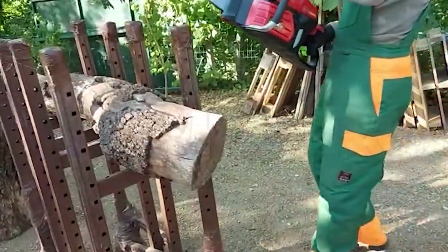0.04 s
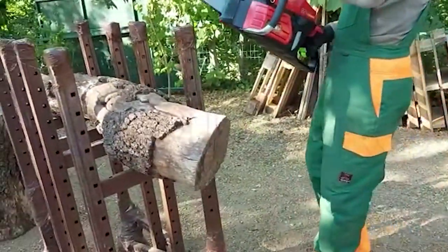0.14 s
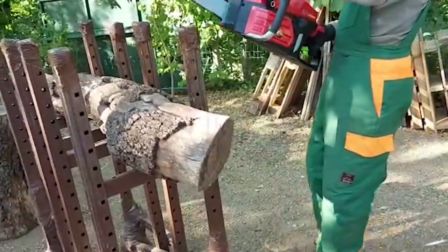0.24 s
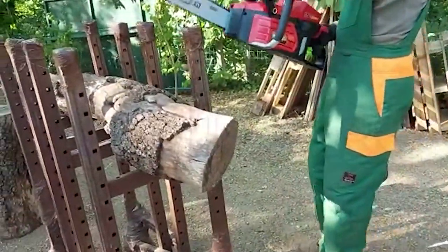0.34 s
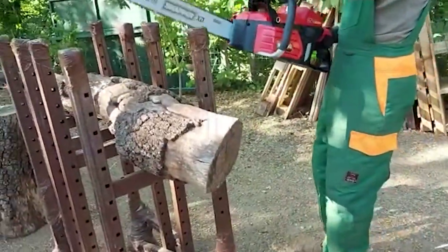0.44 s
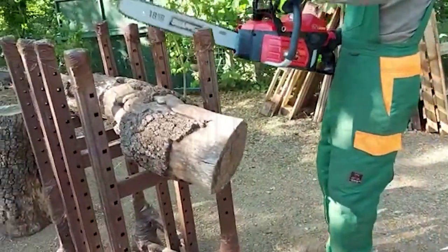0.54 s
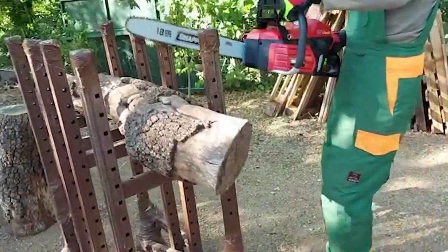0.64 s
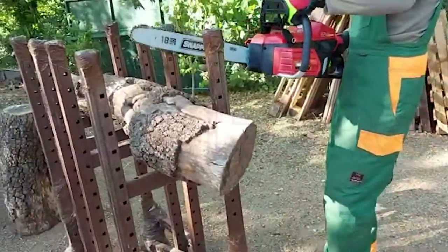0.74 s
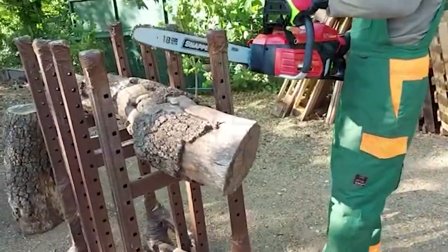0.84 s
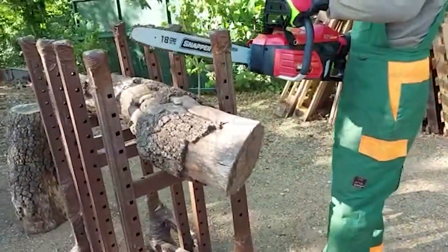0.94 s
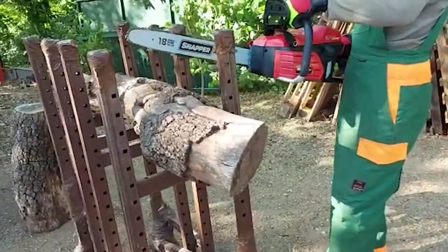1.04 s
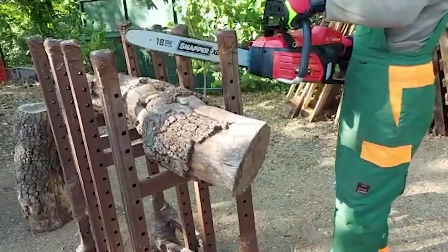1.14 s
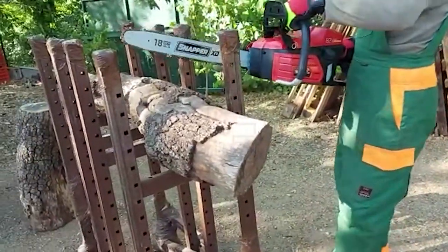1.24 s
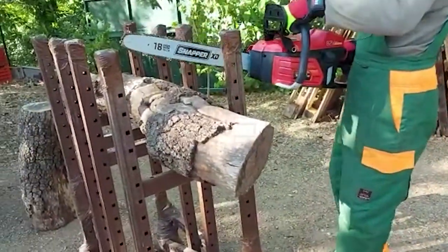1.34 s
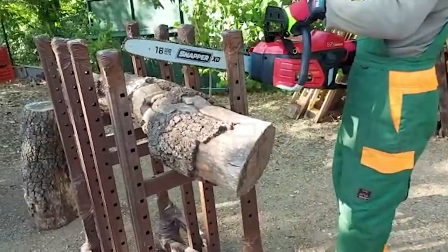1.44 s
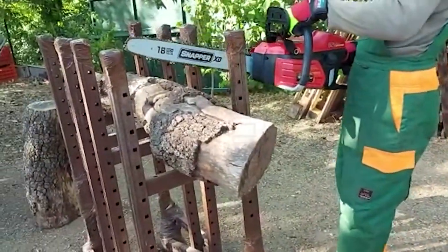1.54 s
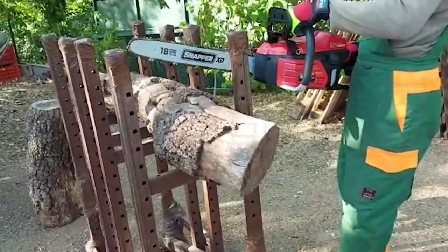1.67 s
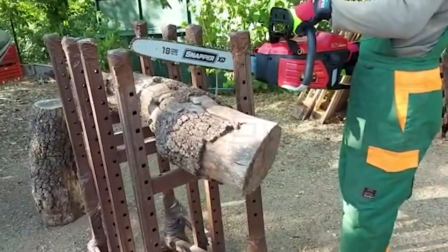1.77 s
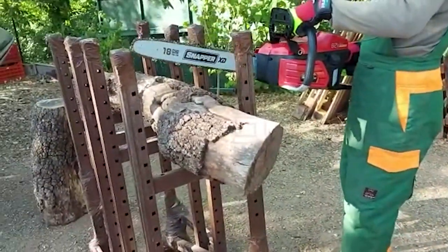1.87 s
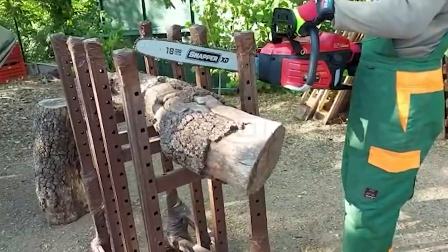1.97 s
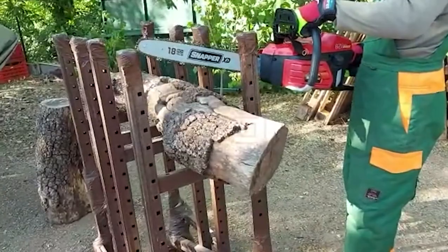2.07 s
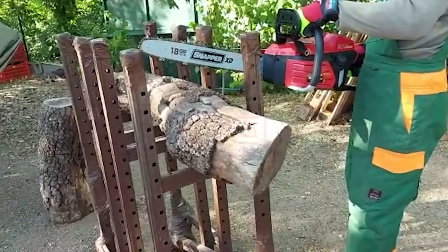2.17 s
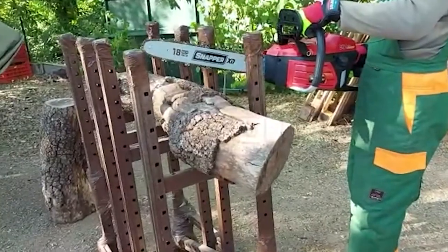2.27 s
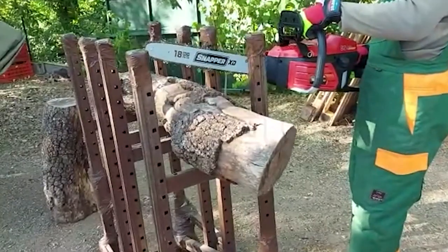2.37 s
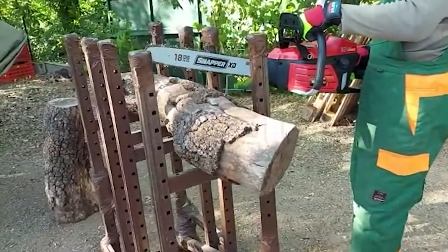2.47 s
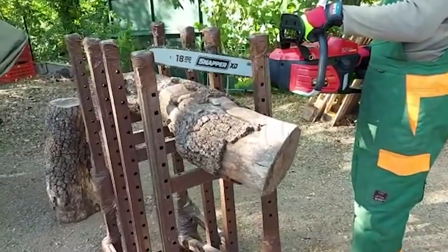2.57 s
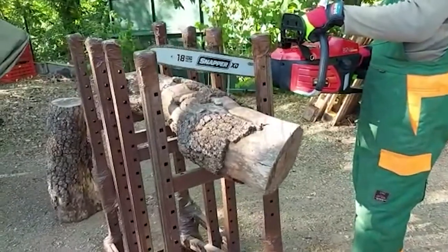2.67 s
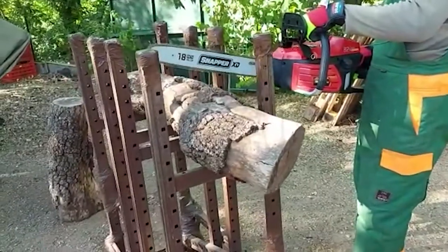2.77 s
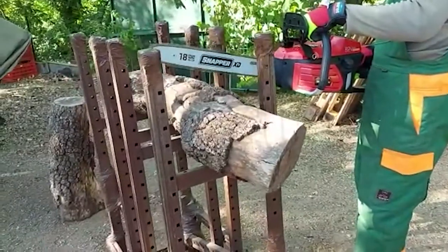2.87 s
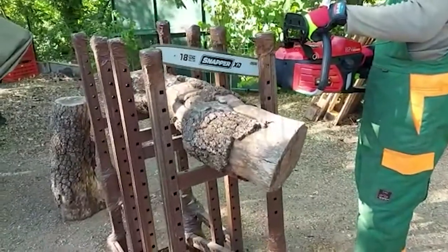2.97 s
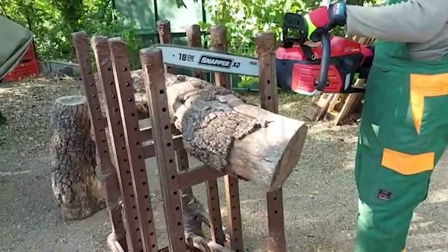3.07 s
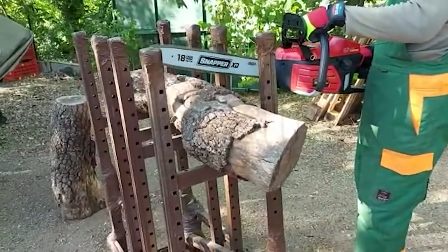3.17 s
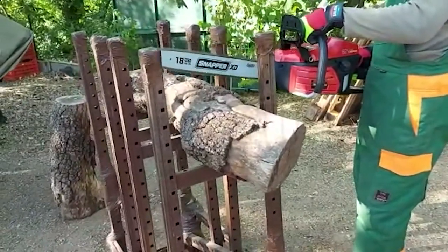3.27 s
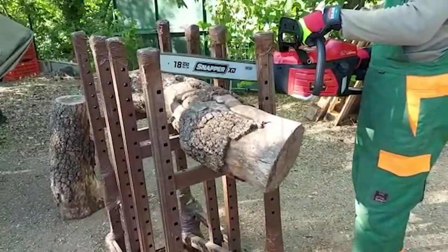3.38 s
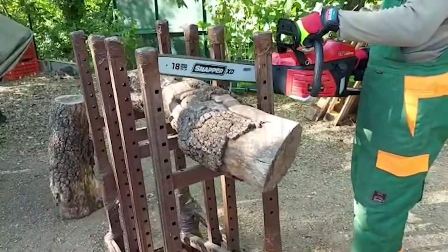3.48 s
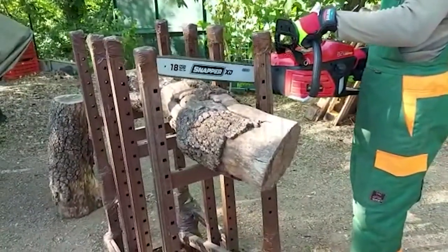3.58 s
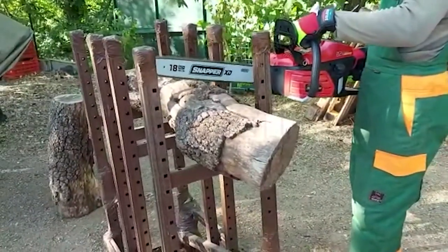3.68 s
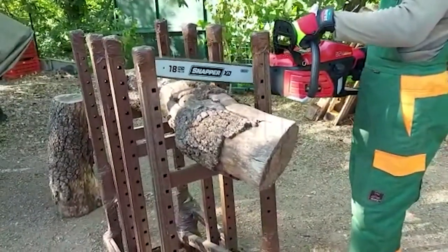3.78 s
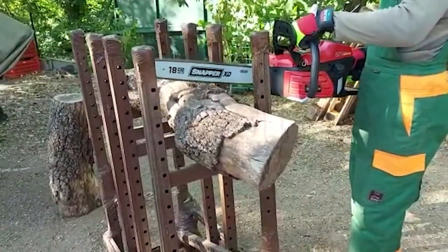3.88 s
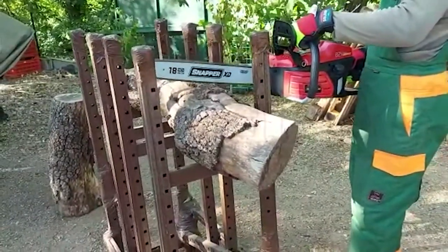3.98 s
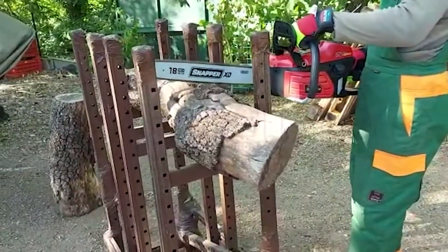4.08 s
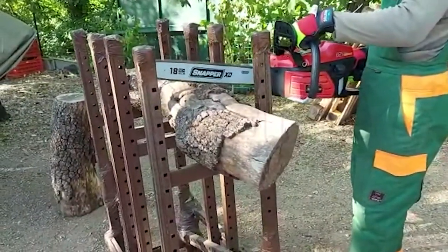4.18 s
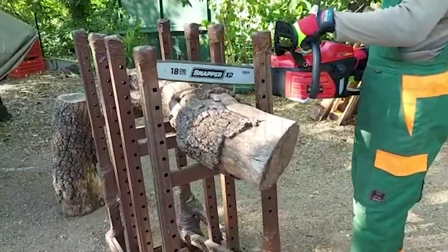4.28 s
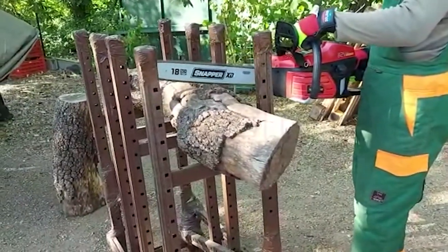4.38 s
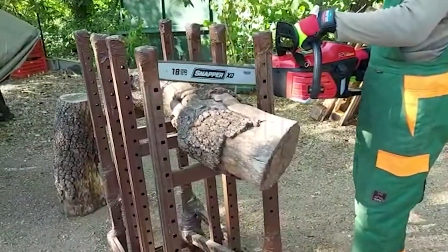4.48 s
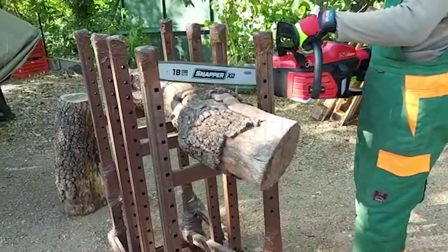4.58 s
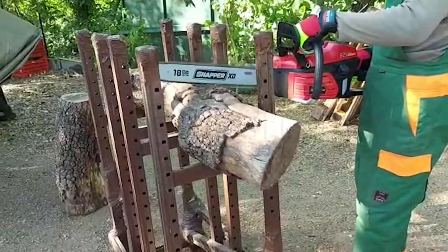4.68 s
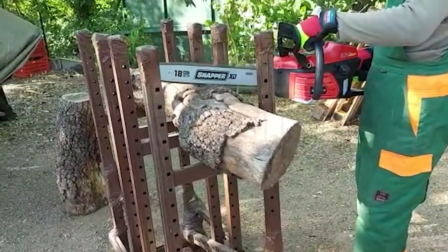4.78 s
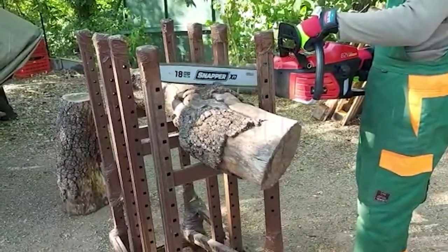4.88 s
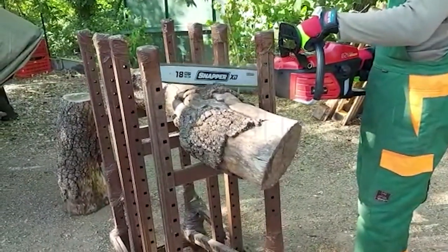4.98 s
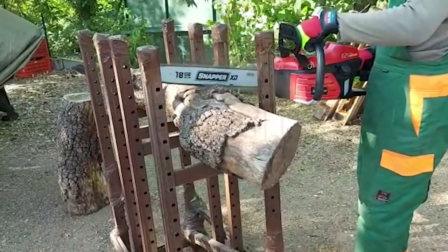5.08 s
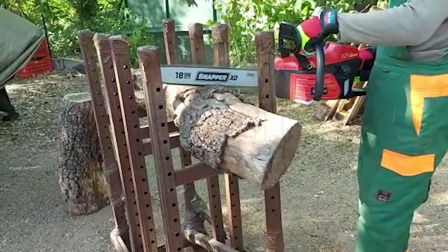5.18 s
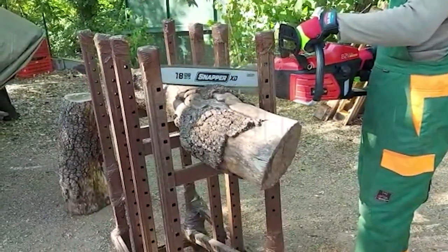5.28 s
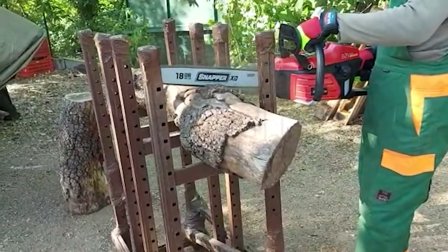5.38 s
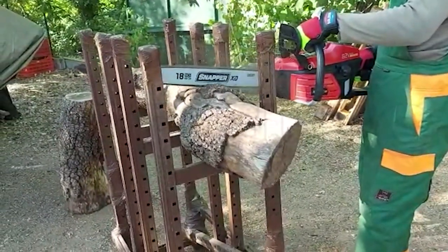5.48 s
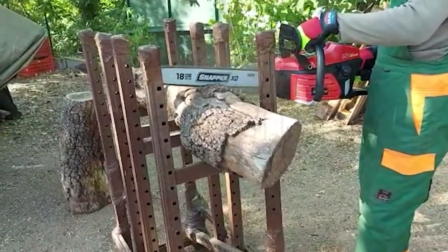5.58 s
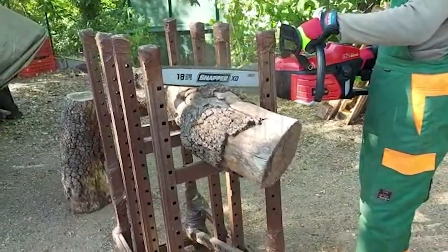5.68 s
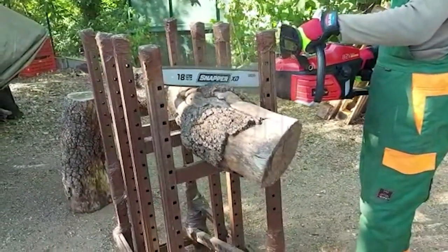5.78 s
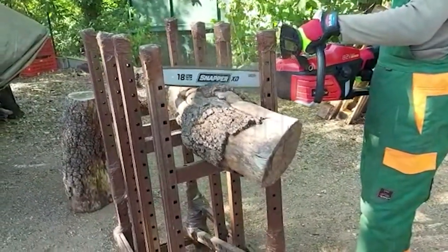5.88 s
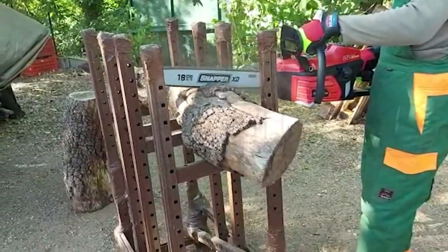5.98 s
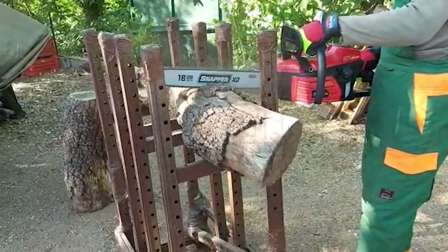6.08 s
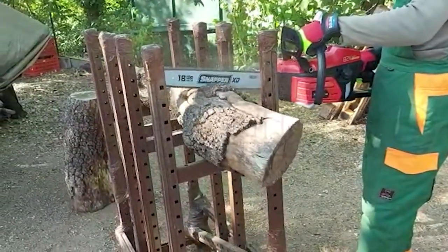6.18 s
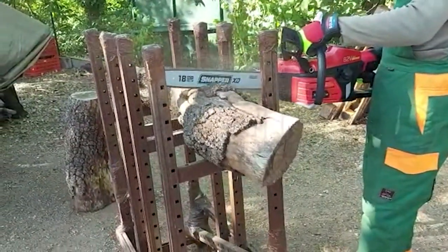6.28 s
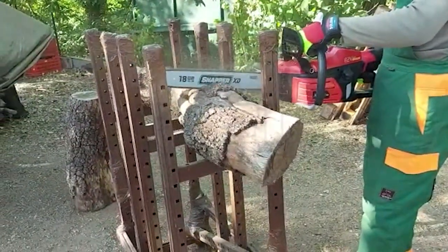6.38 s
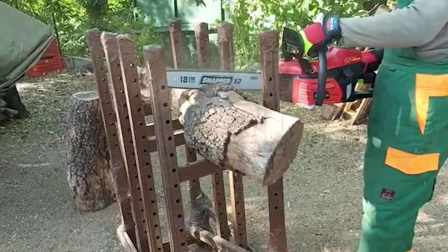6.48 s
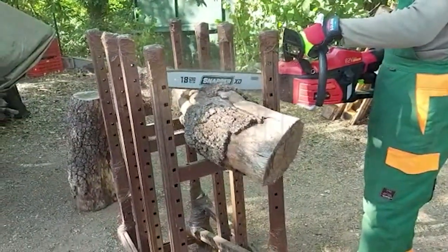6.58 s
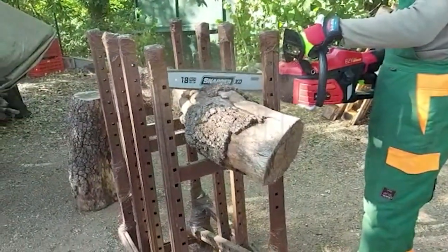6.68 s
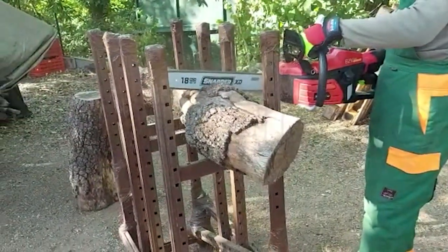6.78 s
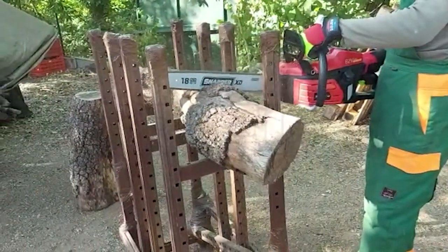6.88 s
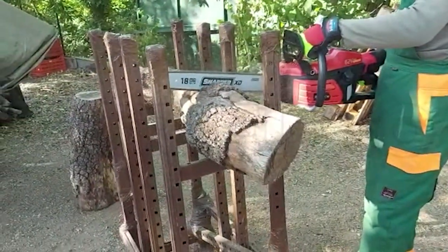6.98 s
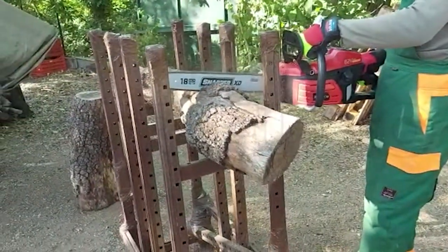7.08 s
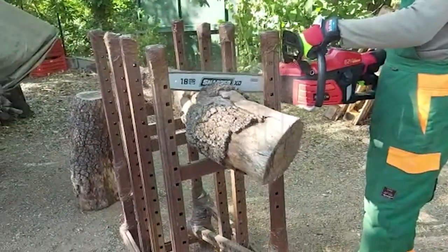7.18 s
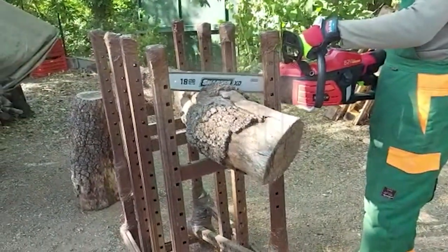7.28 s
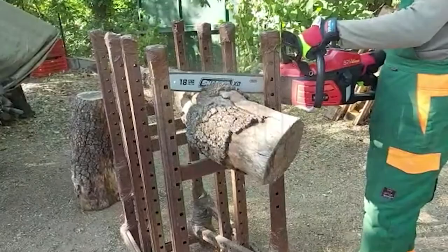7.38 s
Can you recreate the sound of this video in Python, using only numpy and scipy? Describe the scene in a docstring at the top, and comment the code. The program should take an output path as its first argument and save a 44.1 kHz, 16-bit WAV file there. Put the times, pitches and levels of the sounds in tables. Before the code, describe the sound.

Heard close in stereo, a slack chain's clatter fades at once, leaving a nearly silent yard with soft rustling and low handling thumps. After a trigger snap, an electric saw jerks into motion, its pitch rising fast and levelling into a buzzing whine with hissing, rattling chain and ringing guide bar. Lightly touching a log, it sags only slightly in pitch, while wind rumbles against the microphone.

```python
"""A battery chainsaw's chain coasts to rest close to two microphone ports in a yard: filtered noise that quickly fades.
The operator shuffles up to a log (noise strokes, decaying sines) and pulls the trigger (short noise clicks).
The motor spins up to a steady whine, sines locked to one shaft; the chain, noise jerked by that shaft, rattles
round its bar and runs lightly on the wood, while filtered noise makes the bar ring.
Faint outdoor air lies underneath, steady coloured noise; puffs of wind, slowly shaped noise, buffet the ports."""
import sys
import numpy as np
from scipy import signal
from scipy.fft import rfft, irfft
from scipy.io import wavfile

SR = 44100
rng = np.random.default_rng(int(sys.argv[2]) if len(sys.argv) > 2 else 0)


def unload_wav(signal):
    """Save mono or channel-first audio to the path in sys.argv[1] as 16-bit WAV at rate SR, clipped to [-1, 1]."""
    wavfile.write(
        sys.argv[1],
        SR,
        np.round(np.clip(np.atleast_2d(signal).T, -1, 1) * 32767).astype(np.int16),
    )


N = 327663
TIME, FREQ = np.arange(N) / SR, np.fft.rfftfreq(N, 1 / SR)  # s, Hz


def from_db(db):
    """Decibels to amplitude gain."""
    return 10 ** (np.asarray(db) / 20)


def unit(x):
    """Scales to rms 1, over both ports together."""
    return x / np.sqrt(np.mean(x ** 2) + 1e-20)


def curve(rows):
    """Reads a time table at every sample."""
    return np.interp(TIME, *np.transpose(rows))


def at_hz(points, hz=FREQ):
    """Reads a frequency table on a log-frequency axis."""
    f, value = np.transpose(points)
    return np.interp(np.log(hz + 1), np.log(f + 1), value)


def colour(x, db):
    """Filters x by a gain in dB at each frequency, then scales to rms 1."""
    return unit(irfft(rfft(x) * from_db(db), N))


def noise_pair():
    """White noise, unrelated at the two ports."""
    return rng.standard_normal((2, N))


def wander(rate_hz):
    """Smooth random drift of rms 1: noise that fades out above about the given rate."""
    drift = rfft(rng.standard_normal(N)) * np.exp(-(FREQ / rate_hz) ** 2)
    return unit(irfft(drift, N))


def burst(s, decay, rise):
    """Envelope of a blow: a quick rise and an exponential decay, peak 1."""
    age = np.maximum(TIME - s, 0)
    shape = (1 - np.exp(-age / rise)) ** 2 * np.exp(-age / decay)
    return shape / shape.max()


def ports(pair, likeness, balance_db, lead):
    """Turns two unrelated sounds into what the left and right ports hear, by likeness, level and phase."""
    a, b = rfft(pair)
    same = np.clip(likeness, -1, 1)
    right = (same * a + np.sqrt(1 - same ** 2) * b) * np.exp(-1j * lead)
    both = np.array([a * from_db(balance_db / 2), right * from_db(-balance_db / 2)])
    return unit(irfft(both, N))


# Still air of the yard. Each row: frequency in Hz, relative level in dB per Hz.
AIR_SPECTRUM = [(25, -34), (65, -16), (170, -12.5), (250, -2.5), (340, 0), (560, -16.5), (950, -15),
                (1400, -17), (1800, -17.5), (3200, -20), (4800, -15), (8000, -22), (12500, -22.5),
                (15700, -49)]
# The air's side-to-side level. Each row: frequency in Hz, left minus right in dB.
AIR_BALANCE_DB = [(300, 1), (1200, 11.5), (2200, 0), (5000, -8.5), (8000, -7), (11000, 3)]
# How alike the air is at the two ports. Each row: frequency in Hz, likeness from -1 to 1.
AIR_PORT_LIKENESS = [(60, .4), (300, 1), (700, 0.36), (1400, 0.15)]


def yard(air_db=-68):
    """Steady far hum and the hiss of leaves: coloured noise, partly alike at the two ports."""
    air = colour(noise_pair(), at_hz(AIR_SPECTRUM))
    return from_db(air_db) * ports(air, at_hz(AIR_PORT_LIKENESS), at_hz(AIR_BALANCE_DB), 0)


# Wind pressure on the ports. Each row: frequency in Hz, relative level in dB.
BUFFET_SPECTRUM = [(20, -23), (55, 2.5), (100, 1.5), (160, -7.5), (260, -20), (600, -35), (2000, -66)]
# The breeze freshens. Each row: time in seconds, level in dB before the puffs and each port's own gain.
BREEZE_LEVEL = [(0.0, -77), (0.9, -81), (1.9, -68), (2.2, -57), (3.4, -50), (5.6, -47), (7.43, -44.5)]
# Gusts on top. Each row: peak in seconds, half length in seconds, level in dB before each port's own gain.
GUST_ROWS = [(5.08, 0.05, -48), (5.9, 0.08, -43), (6.28, 0.3, -37), (6.36, 0.035, -32), (6.95, 0.12, -46),
             (7.31, 0.07, -40)]


def wind(lump_db=2, left_db=-8, right_db=3, puff_db=3, puff_hz=6, gust_pitch=1.4):
    """Lumpy pressure, unrelated at the two ports: a puffing breeze and a few faster, higher gusts."""
    lumps = np.array([wander(16), wander(33)])
    eddies = noise_pair() * from_db(lump_db * lumps)
    breeze_gain = from_db(curve(BREEZE_LEVEL) + puff_db * wander(puff_hz))
    breeze = breeze_gain * colour(eddies, at_hz(BUFFET_SPECTRUM))
    gust_gain = sum(from_db(db) * np.exp(-((TIME - s) / length) ** 2) for s, length, db in GUST_ROWS)
    gusts = gust_gain * colour(eddies, at_hz(BUFFET_SPECTRUM, FREQ / gust_pitch))
    return (breeze + gusts) * from_db([[left_db], [right_db]])


# Brushing of cloth and grit. Each row: frequency in Hz, relative level in dB.
CLOTH_SPECTRUM = [(200, 6), (800, -2.5), (1600, -3), (4500, -6.5), (8000, -11.5), (15000, -17)]
# Clothes and soles brushing. Each row: start in seconds, level in dB, decay in seconds.
BRUSH_STROKES = [(0.06, -62.5, 0.12), (0.245, -62, 0.031), (0.79, -72, 0.03), (1.34, -69, 0.04),
                 (1.5, -64.5, 0.14), (1.93, -63.5, 0.68), (2.55, -67, 0.23)]
# Soft thumps of steps and handling.
# Each row: start in seconds, level in dB before each port's own gain, pitch in Hz, decay in seconds.
STEP_THUMPS = [(0.258, -53, 306, 0.012), (1.07, -60, 70, .02), (1.145, -51, 65, 0.013),
               (1.6, -51, 64.4, .03), (1.73, -55, 65, .025), (1.825, -52, 65, .014),
               (2.085, -50, 70, 0.023), (2.21, -46, 65.5, 0.036), (2.44, -43, 70.4, .014),
               (2.585, -34, 73, 0.017), (2.631, -42, 73, 0.065)]


def operator(grain_db=1.0, thump_rise=0.0052, brush_rise=0.009):
    """Grainy brushing of cloth and grit (noise), and dull thumps (decaying sines) mostly on the right."""
    brush = colour(noise_pair() * from_db(grain_db * wander(150)), at_hz(CLOTH_SPECTRUM))
    strokes = sum(from_db(db) * burst(s, decay, brush_rise) for s, db, decay in BRUSH_STROKES)
    thumps = 0
    for s, db, hz, decay in STEP_THUMPS:
        swing = np.sin(2 * np.pi * hz * (TIME - s))
        thumps = thumps + from_db(db) * burst(s, decay, thump_rise) * swing
    return brush * strokes + thumps * from_db([[-8], [2]])


# Plastic of the switch. Each row: frequency in Hz, relative level in dB per Hz.
SWITCH_SPECTRUM = [(300, -2), (1500, -6), (2250, 1), (2700, -9), (3600, 3), (4700, -10), (5400, -6),
                   (8300, -9), (9900, -20), (11300, 1), (12700, -10), (14500, -22)]
# The trigger's click and its softer seating. Each row: start in seconds, level in dB, decay in seconds.
TRIGGER_CLICKS = [(2.626, -42, 0.0035), (2.641, -57, 0.018)]


def trigger(rise=0.0026):
    """The plastic switch snaps and seats as the motor starts: two short bursts of noise."""
    blows = sum(from_db(db) * burst(s, decay, rise) for s, db, decay in TRIGGER_CLICKS)
    return blows * colour(noise_pair(), at_hz(SWITCH_SPECTRUM))


# The motor's speed is given as the rate of its drive pulses.
TRIGGER_S, FREE_HZ, SPIN_UP_S, SPIN_UP_SHAPE = 2.624, 553.1, 0.366, 0.95
ENGAGE_S = 2.703  # the moment the sprocket takes the chain along
PULSES_PER_TURN = 6


def spin():
    """Share of its free speed that the motor has reached, closing in on 1 after the trigger is pulled."""
    return 1 - np.exp(-(np.maximum(TIME - TRIGGER_S, 0) / SPIN_UP_S) ** SPIN_UP_SHAPE)


def engaged(rise_s):
    """Rises from 0 to 1 once the chain is driven."""
    return 1 - np.exp(-np.maximum(TIME - ENGAGE_S, 0) / rise_s)


# Drag of the wood on the chain. Each row: time in seconds, pulse rate lost in Hz.
WOOD_DRAG = [(4.36, 0), (4.9, 6.7), (5.26, 10.7), (5.62, 8.2), (5.8, 10.4), (6.7, 12.1), (6.88, 7.8),
             (7.24, 12), (7.43, 9.6)]


def sprocket(flutter=0.001735, flutter_hz=22):
    """Speed (Hz) and angle (turns) of the sprocket: drag slows it and a random flutter unsettles it."""
    pulse_hz = np.maximum(FREE_HZ * spin() - curve(WOOD_DRAG), 1)
    hz = pulse_hz / PULSES_PER_TURN * (1 + flutter * wander(flutter_hz))
    return hz, np.cumsum(hz) / SR


# How alike the saw's noise is at the two ports. Each row: frequency in Hz, likeness from -1 to 1.
SAW_LIKENESS = [(100, 1), (300, 0.93), (800, 0.92), (1400, 0.76), (2300, 0.65), (3100, -0.037),
                (6800, -0.03), (15000, -0.15)]
# The saw's side-to-side level. Each row: frequency in Hz, left minus right in dB.
SAW_BALANCE_DB = [(300, 0.5), (700, 0), (1400, 2), (2400, 3.5), (4400, -4), (8000, -5), (15000, -2)]
# The saw's phase across the ports. Each row: frequency in Hz, radians by which left leads.
SAW_LEAD = [(300, -0.096), (550, 0.17), (830, -0.2), (1100, -0.42), (1420, -0.9), (1640, -0.65),
            (1900, -0.39), (2200, -1), (2900, -0.12), (4500, 0.022)]


def saw_at_ports(pair):
    """The saw's noise as the two ports hear it, with its likeness, balance and phase."""
    return ports(pair, at_hz(SAW_LIKENESS), at_hz(SAW_BALANCE_DB), at_hz(SAW_LEAD))


def tone(hz, turns, db):
    """One line of the drive at the two ports: a sine that follows the shaft's angle from a random phase."""
    angle = 2 * np.pi * (turns + rng.random())
    side_db = at_hz(SAW_BALANCE_DB, hz) / 2
    left = from_db(db + side_db) * np.sin(angle)
    right = from_db(db - side_db) * np.sin(angle - at_hz(SAW_LEAD, hz))
    return np.array([left, right]) * np.sqrt(2)


# Resonances of housing and guide bar. Each row: centre in Hz, width in Hz, lift in dB.
HOUSING_MODES = [(310, 28, 6.5), (710, 52, 7.5), (832, 66, 11), (1465, 293, 11.5), (1682, 150, 4),
                 (2112, 120, 4.5), (2453, 110, 7), (2650, 250, -6.5), (2890, 180, 3.5), (3236, 110, -10),
                 (3680, 80, -1.5), (4330, 80, 6), (4680, 70, 7), (6200, 280, 3), (12550, 100, 1.5),
                 (14900, 530, 0)]


def housing_db(hz):
    """Lift that the saw's resonances give to each frequency."""
    return sum(db / (1 + (2 * (hz - centre) / width) ** 2) for centre, width, db in HOUSING_MODES)


# Modes of the motor casing. Each row: centre in Hz, width in Hz, strength in dB.
CASING_MODES = [(342, 103, -2), (487.6, 106, 0.5), (538, 57, -3.5), (680, 180, 1.5), (843, 147, 6.5),
                (959, 192, -1), (1454, 250, 2), (1630, 210, -1.5), (2103, 350, 5), (2410, 170, 11),
                (2935, 280, 8.5)]


def casing_db(hz):
    """How well the motor casing radiates each frequency: steep peaks with dark valleys between."""
    power = sum(from_db(db) ** 2 / (1 + (2 * (hz - centre) / width) ** 2) ** 3
                for centre, width, db in CASING_MODES)
    return 10 * np.log10(power)


# Modes of the guide bar. Each row: centre in Hz, width in Hz, strength in dB before division by width.
GUIDE_BAR_MODES = [(328, 20, -14), (472, 30, -18), (831, 92, 0), (1446, 53, 1), (2399, 44, 4.5),
                   (2764, 120, -5.5), (6370, 260, -2.5), (11360, 200, 5)]


def bar(level_db=-13, full_speed_db=-15, db_per_drag_hz=-1, build_s=0.15):
    """Guide bar ringing at its modes: resonant noise that builds, then eases with speed and the wood's drag."""
    power = sum(from_db(db) ** 2 / width / (1 + (2 * (FREQ - hz) / width) ** 2) ** 2
                for hz, width, db in GUIDE_BAR_MODES)
    ring = colour(noise_pair(), 10 * np.log10(power))
    ring_db = level_db + full_speed_db * spin() + db_per_drag_hz * curve(WOOD_DRAG)
    return engaged(build_s) * from_db(ring_db) * saw_at_ports(ring)


# Weaker lines of gears and sprocket.
# Each row: multiple of the sprocket speed, level in dB before the housing, dB gained per Hz of drag.
GEAR_ROWS = [(2.928, -45, 0.0), (4, -49.5, -0.82), (5.015, -54, -0.4), (8.004, -44.5, -0.16),
             (8.97, -45, -0.0454), (10.01, -41, -0.84), (14.97, -48, 0), (16.1, -56, 0), (21, -45, -0.12),
             (27.1, -43.5, 0), (32, -52, 0)]


def gears(hz, turns, shake_db=1.5, shake_hz=12, backlash=0.046, smallest_hz=215):
    """Unsteady lines that flare as they sweep through the housing's resonances; the small body radiates no bass."""
    lift_db, drag, out = housing_db(FREQ), curve(WOOD_DRAG), np.zeros((2, N))
    for multiple, db, drag_db in GEAR_ROWS:
        line_hz = multiple * hz
        level_db = db + drag_db * drag + np.interp(line_hz, FREQ, lift_db) + shake_db * wander(shake_hz)
        radiated = (hz / hz.max()) ** 1.3 / (1 + (smallest_hz / line_hz) ** 10)
        line_turns = multiple * turns + backlash * wander(shake_hz)
        out += radiated * tone(line_hz, line_turns, level_db)
    return out


def chirp(hz, turns, multiple=3, level_db=-27, end_s=2.91, fade_s=0.0091):
    """The heavy starting current makes the motor sing at a multiple of its pulses up to about half speed."""
    per_turn = multiple * PULSES_PER_TURN
    starting = (1 - np.tanh((TIME - end_s) / fade_s)) / 2
    return starting * tone(per_turn * hz, per_turn * turns, level_db + casing_db(per_turn * hz))


# Harmonics of the drive pulses. Each row: multiple of the pulse rate, level in dB before the motor casing,
# dB gained per Hz of drag, dB gained near standstill.
PULSE_HARMONICS = [(1, -25, 0, -10.5), (2, -31.5, 0.24, -1), (3, -26.5, -0.0638, -29),
                   (4, -33.5, -0.26, -11), (5, -36.5, -0.01, -20), (6, -39, -0.1, -18)]


def whine(hz, turns, shake_db=0.29, shake_hz=45):
    """Harmonics of the drive pulses flare as they sweep through the casing's modes; the higher ones shake more."""
    out, drag, slowness = np.zeros((2, N)), curve(WOOD_DRAG), 1 - spin()
    for k, db, drag_db, slow_db in PULSE_HARMONICS:
        multiple = round(k) * PULSES_PER_TURN
        level_db = db + slow_db * slowness + drag_db * drag
        level_db = level_db + casing_db(multiple * hz) + k * shake_db * wander(shake_hz)
        out += tone(multiple * hz, multiple * turns, level_db)
    return out


def coasting(first_db=-30.5, rest_s=0.088, shape=1.7, echo_db=-51.5, echo_db_per_s=150):
    """Strength of the clatter as the undriven chain runs down and its echo in the yard fades."""
    run_down = np.maximum(1 - TIME / rest_s, 0) ** shape
    return from_db(first_db) * run_down + from_db(echo_db - echo_db_per_s * TIME)


# The drive stirs just before it engages. The row: start in seconds, level in dB, decay in seconds, rise in seconds.
DRIVE_STIR = (2.68, -47, 0.04, 0.015)


def driven(level_db=-15.1, db_per_tenfold_speed=6.5, jerk_share=0.16, jerk_s=0.003, take_up_s=0.049):
    """Strength of the driven clatter: a stir, a jerk, then a swell as slack is taken up and speed grows."""
    s, db, decay, rise = DRIVE_STIR
    moving = jerk_share * engaged(jerk_s) + (1 - jerk_share) * engaged(take_up_s)
    speed_db = db_per_tenfold_speed * np.log10(spin() + 1e-9)
    return from_db(db) * burst(s, decay, rise) + moving * from_db(level_db + speed_db)


def reflected(pair, echo_db=-13, count=14):
    """Saw horse, log and legs scatter the hiss: close echoes within 10 ms, different at each port."""
    taps = np.zeros((2, SR // 100))
    delays = rng.integers(1, taps.shape[1], (2, count))
    np.put_along_axis(taps, delays, rng.standard_normal((2, count)), 1)
    taps *= from_db(echo_db) / np.linalg.norm(taps, axis=1, keepdims=True)
    return pair + signal.oaconvolve(pair, taps, axes=1)[:, :N]


# Chain clatter before the housing. Each row: frequency in Hz, relative level in dB per Hz.
CLATTER_SPECTRUM = [(40, -50.5), (190, -18.5), (280, -8), (600, -3), (950, -6), (1170, -12), (1400, -7),
                    (1900, -4), (3300, 3), (5500, 0), (9800, -2), (12300, 5), (14000, 0.5), (15700, -3.5)]
# The undriven chain sounds hollow: fuller near 330 Hz, thinner near 1450 Hz, with a bright hiss.
# Each row: frequency in Hz, relative dB on the clatter.
SLACK_COLOUR = [(150, -14.5), (330, 5), (600, -3.5), (900, 2), (1450, -9), (2300, 2), (4400, 1), (8000, 3),
                (12000, 3.5), (15000, -6)]
TURNS_PER_LAP = 11.8  # sprocket turns for one lap of the chain
# Slap of chain on bar, on the clatter's low part: strong when slack, eased by full speed, raised per Hz of drag.
SLAP_DB, SLAP_SPEED_DB, SLAP_DRAG_DB = 13, -23.5, 0.9329


def chain(turns, count=62, link_db=1.0, pulse_depth=0.99, limp_depth=0.23, flicker_db=0.37, slap_hz=1300):
    """Links strike bar and sprocket as noise: uneven links come round every lap, and drive pulses jerk them."""
    laps = turns / TURNS_PER_LAP
    links_db = np.interp(laps * count, np.arange(count), rng.standard_normal(count), period=count)
    strikes = noise_pair() * from_db(link_db * links_db + flicker_db * wander(34))
    pulse = 2 * np.pi * PULSES_PER_TURN * turns
    jerks = 1 + pulse_depth * np.cos(pulse) + limp_depth * np.cos(pulse / 2)  # pulses alternate strong and weak
    low = 1 / (1 + (FREQ / slap_hz) ** 2)
    slap_db = SLAP_DB + SLAP_SPEED_DB * spin() + SLAP_DRAG_DB * curve(WOOD_DRAG)
    slaps = irfft(rfft(strikes * jerks) * low, N) * from_db(slap_db)
    hiss = reflected(irfft(rfft(strikes) * (1 - low), N))
    clatter = colour(slaps + hiss, at_hz(CLATTER_SPECTRUM) + housing_db(FREQ))
    heard = saw_at_ports(clatter)
    return driven() * heard + coasting() * colour(heard, at_hz(SLACK_COLOUR))


def saw(build_s=0.04):
    """Motor, gears and driven chain follow one shaft; the tones build a little after the clatter."""
    hz, turns = sprocket()
    tones = whine(hz, turns) + chirp(hz, turns) + gears(hz, turns)
    return engaged(build_s) ** 2 * tones + bar() + chain(turns)


def scene():
    """Everything in the yard, from the far air to the saw."""
    return yard() + wind() + operator() + trigger() + saw()


def record(dry, edge_hz=15850):
    """The recorder's band limit: a steep low-pass filter."""
    low_pass = signal.firwin(701, edge_hz, window=("kaiser", 9), fs=SR)
    return signal.oaconvolve(dry, low_pass[None], "same")


dry = scene()
out = record(dry)
unload_wav(out)
```